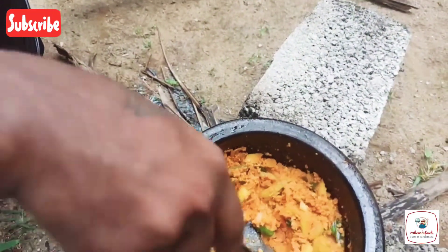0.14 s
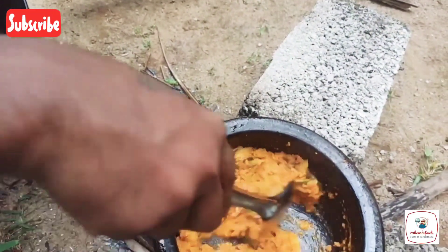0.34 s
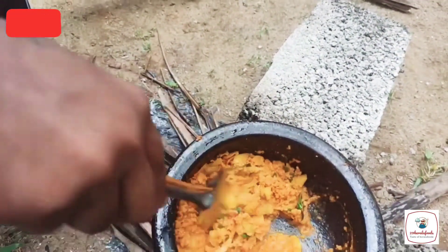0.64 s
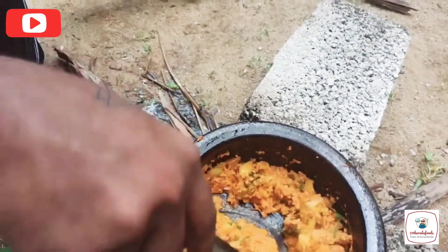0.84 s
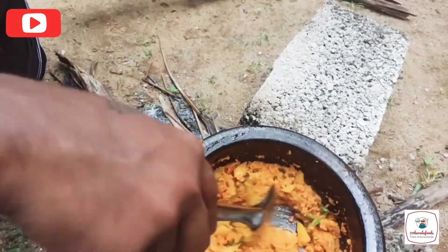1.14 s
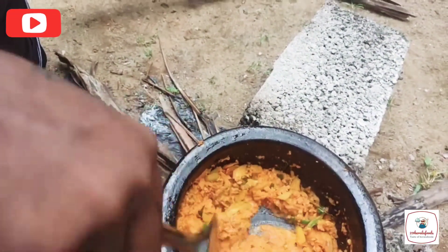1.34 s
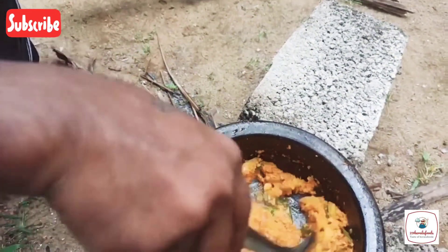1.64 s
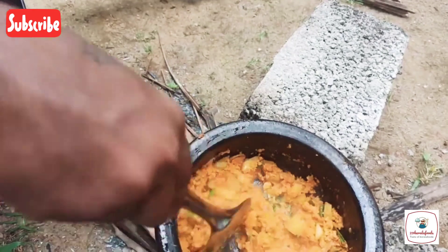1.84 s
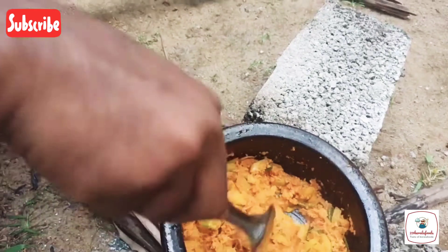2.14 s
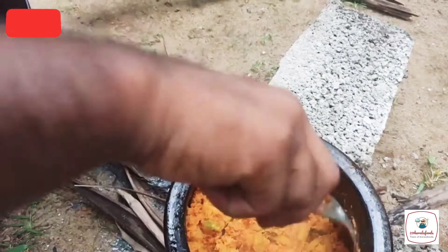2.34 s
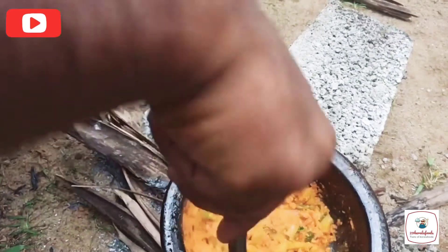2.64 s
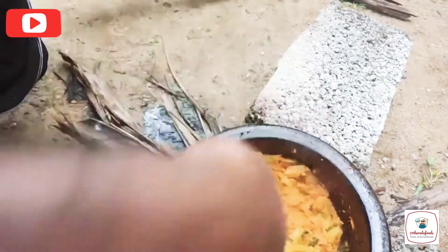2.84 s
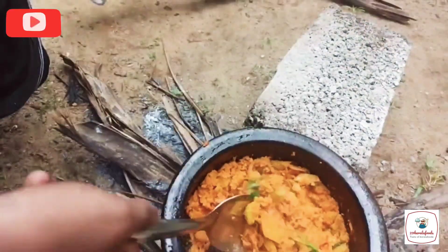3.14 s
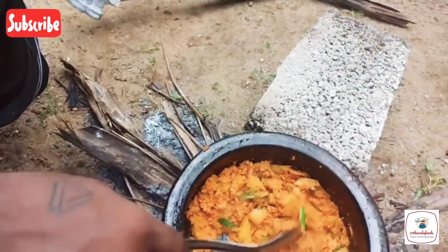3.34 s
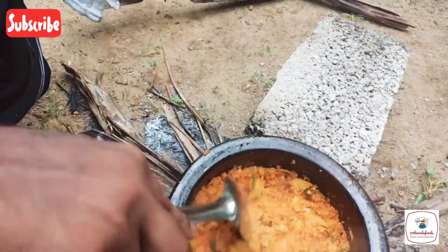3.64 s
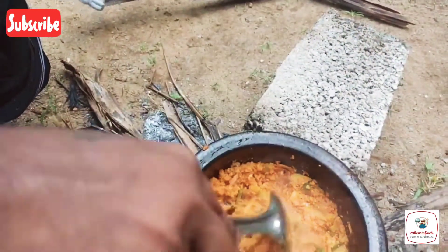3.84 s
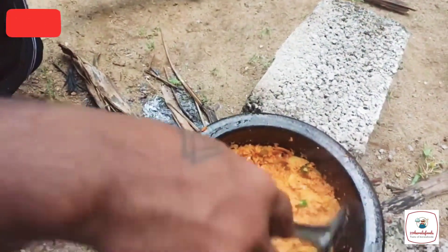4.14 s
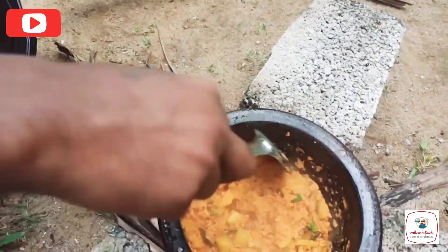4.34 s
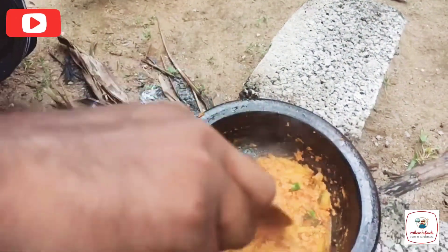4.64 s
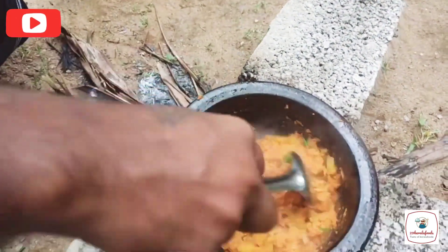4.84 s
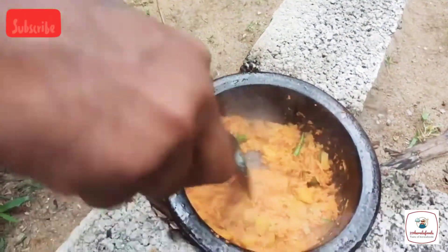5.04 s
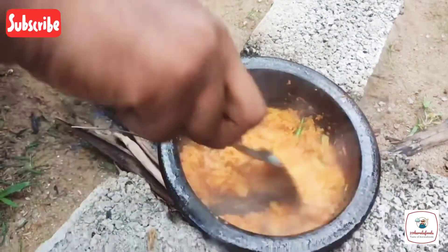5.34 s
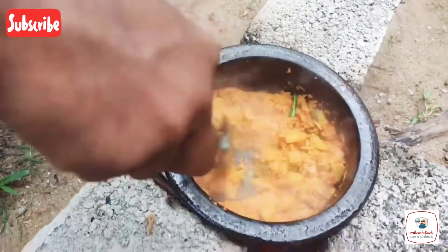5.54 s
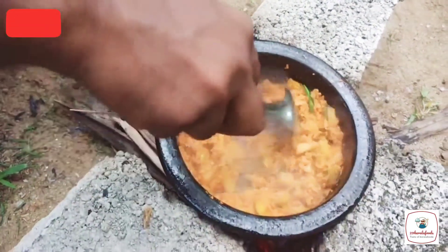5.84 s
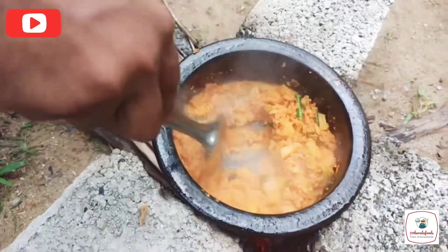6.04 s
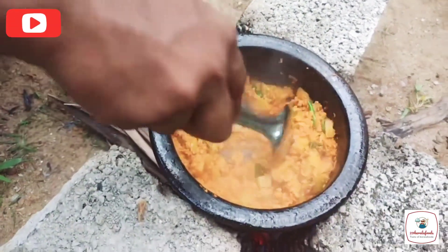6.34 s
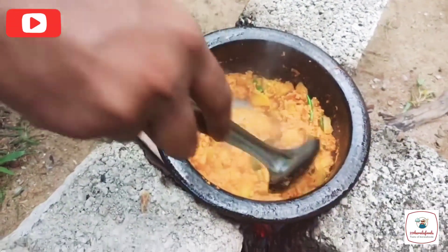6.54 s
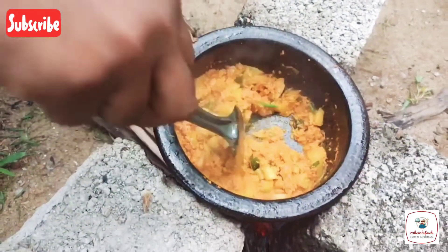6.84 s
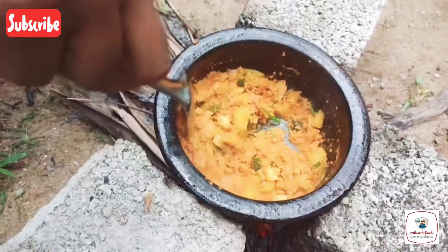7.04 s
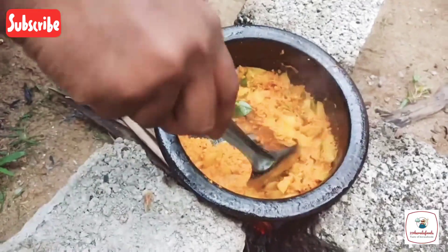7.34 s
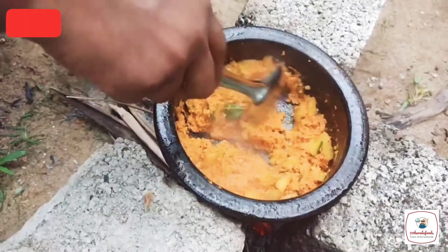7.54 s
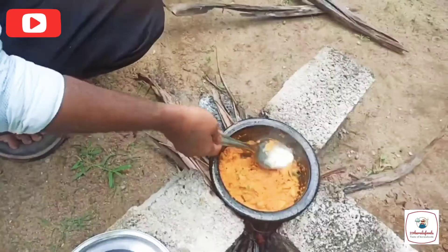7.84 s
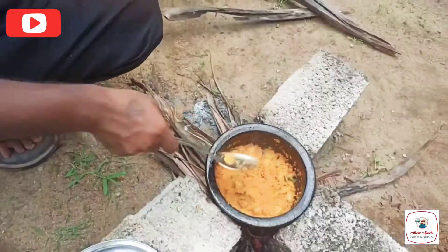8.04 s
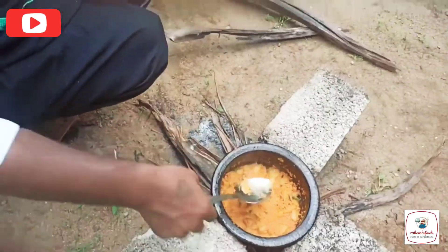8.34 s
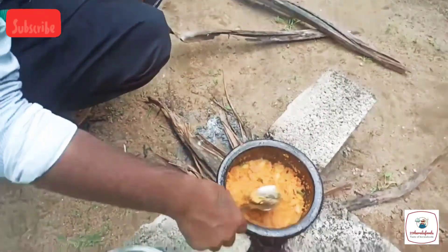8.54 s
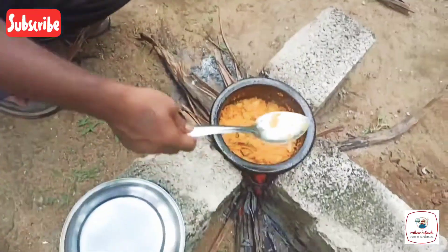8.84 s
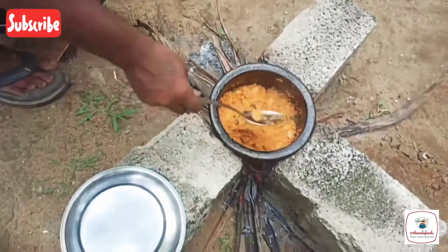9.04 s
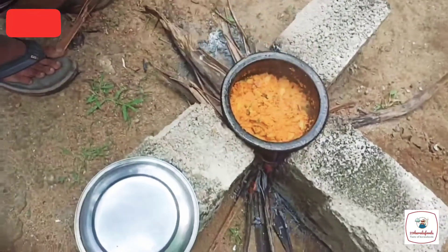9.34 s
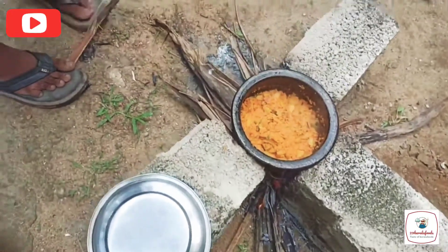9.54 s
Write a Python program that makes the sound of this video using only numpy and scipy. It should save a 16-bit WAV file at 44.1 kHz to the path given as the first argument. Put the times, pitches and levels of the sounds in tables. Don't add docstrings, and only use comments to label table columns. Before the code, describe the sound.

Close-up irregular stirring: gritty metal scrapes, dull thuds and brief bright clinks in a simmering pot, suddenly dropping to near silence.

```python
import sys
import numpy as np
from scipy import signal
from scipy.fft import rfft, irfft
from scipy.io import wavfile
from scipy.ndimage import uniform_filter1d

SR = 44100
rng = np.random.default_rng(int(sys.argv[2]) if len(sys.argv) > 2 else 0)


def makeup_ratio(level_db):
    decades = np.asarray(level_db, float) / 20
    return 10 ** decades


def bounce(signal):
    frames = np.transpose(np.atleast_2d(signal))
    limited = np.clip(frames, -1, 1)
    pcm = np.round(limited * 32767).astype(np.int16)
    wavfile.write(sys.argv[1], SR, pcm)


N = 427329

# f/Hz, level/dB per Hz
HISS_SPECTRUM = [(35, -58), (60, -28), (153, 1.5), (1420, -16.5), (4180, -19), (8260, -30), (8860, -26.5),
                 (9500, -33.5), (11200, -29.5), (16300, -35.5)]
# t/s, level/dB
FADE = [
    (7.735, 2.5),
    (7.752, -5.5),
    (7.765, -56),
]
# f/Hz, level/dB per Hz
SIZZLE_SPECTRUM = [(71, -28), (120, -0.5), (213, -1.5), (354, -6), (818, -4.5), (1340, -13), (2270, -15),
                   (4020, -12), (5350, -19.5), (6570, -11), (8220, -13.5), (10900, -37.5), (11900, -23),
                   (15800, -16.5)]
# f/Hz, left-right correlation
SIZZLE_LIKENESS = [(60, 0.67), (180, 0.6), (550, 0.71), (1650, 0.17), (4970, -0.01), (15000, 0.05)]
# f/Hz, level/dB per Hz
BODY = [(88, -54), (150, -18), (297, -8), (564, -1.5), (1120, -11), (1280, -17.5), (1820, -16),
        (3390, -22.5), (4200, -21), (5520, -30), (6700, -21), (8310, -22.5), (11100, -45.5), (12000, -25),
        (15800, -18)]
# f/Hz, level/dB over the body, t60/s
STEEL = [(1590, 5, .04), (1820, 6, .05), (2820, 5, .06), (3180, 4, .04), (3840, 4, .04), (4240, 8, .05),
         (4530, 2, .04), (6400, 5, .03), (6840, 5, .035), (7270, 1, .04), (7500, 5, .045), (8280, 3, .045),
         (8990, 5, .04)]
# f/Hz, t60/s
DAMPING = [(250, 0.078), (700, 0.03), (2000, 0.021), (6000, 0.055), (15000, 0.026)]
# f/Hz, phase/rad
PORT_SCATTER = [(300, .1), (700, 0.25), (1400, 1.7), (3000, 1.6), (7000, 6.5)]
# f/Hz, left over right level/dB
PORT_LEAN = [(60, -0.5), (180, 2), (550, 0.5), (1650, -1.5), (4970, 2.5), (15000, 11.5)]
PART_BORDERS = [1150, 3000, 11300]
DIFFUSE = [.1, .3, .6, .7]
# t/s, level/dB, spoon ring over thud level/dB, thud f/Hz
THUDS = [(.078, -20, -30, 532), (.28, -7.5, -35, 582), (.394, -12.5, -28, 564), (.824, -7, -28, 532),
         (.933, -22, -28, 458), (1.065, -11, -20, 584), (1.126, -15, -24.5, 643),
         (1.781, -18.5, -25.5, 526), (2.169, -19.5, -27.5, 530), (2.48, -9, -35.5, 556),
         (3.56, -35, -12.5, 620), (3.82, -30.5, -23, 410), (4.224, -18, -23, 577),
         (4.311, -26.5, -14.5, 765), (4.634, -25, -25, 500), (4.86, -10, -25, 604),
         (5.355, -14.5, -21, 485), (5.558, -19, -28.5, 575), (5.572, -9.5, -31.5, 504),
         (7.282, -13, -33.5, 490), (7.394, -19, -32.5, 540), (7.426, -29, -21.5, 640),
         (7.537, -11.5, -29, 625)]
# t/s, level/dB, wall ring over thud level/dB, thud f/Hz, ring f/Hz
RAPS = [(.711, -7.5, -17, 509, 1920), (1.05, -11.5, -9.5, 650, 1923), (1.354, -3.5, -8.5, 617, 1527),
        (1.434, -12.5, -8, 466, 2410), (1.519, -14.5, -17.5, 488, 2200), (1.669, -22.5, -16, 650, 1600),
        (2.456, -18, -11.5, 780, 1580), (2.918, -28, -5.5, 718, 2640), (3.76, -14, -12, 520, 1186),
        (4.122, -25.5, -21, 577, 1260), (4.844, -21, -14.5, 783, 3060), (5.289, -14, -5, 597, 1916),
        (5.645, -15.5, -19.5, 536, 1780), (5.789, -16, -18, 478, 1860), (5.87, -18, -15, 463, 2210),
        (6.201, -22.5, -3, 473, 1710), (6.765, -16, -21.5, 657, 1410), (6.84, -15, -11, 552, 1380),
        (7.156, -12.5, -6, 590, 1510), (7.239, -18.5, -19.5, 394, 2150)]
# t/s, level/dB, spoon ring over thud level/dB, thud f/Hz, ring f/Hz
CLINKS = [(.728, -20, 1, 521.4, 6420), (.756, -14.5, -2.5, 535, 8000), (2.431, -33, -4, 991, 7290),
          (2.439, -24, 7, 547, 6480), (2.548, -17.5, -1.5, 560, 3930), (2.569, -17, -11.5, 617, 6880),
          (2.609, -22, -7.5, 612, 4170), (2.626, -18.5, -4.5, 592, 4270), (2.652, -17.5, 3.5, 621, 4240),
          (4.162, -21.5, 1, 740, 7000), (4.403, -21, -14, 789, 6470), (4.454, -14, -2.5, 660, 6300),
          (6.093, -30, -10, 510, 3300), (6.734, -12.5, -9.5, 630, 6620), (7.097, -13, 3.5, 601, 8270)]
# start
# t/s, # length t/s, level/dB, from f/Hz, to f/Hz
SQUEAKS = [(.0, 0.78, -57, 4024, 4007), (1.17, .125, -36, 2450, 2300), (1.52, .16, -36, 950, 1300),
           (2.0, .11, -38, 1200, 1500), (2.55, .12, -33, 4150, 4300), (4.455, .09, -31, 4500, 4300),
           (5.6, .11, -35.5, 1960, 1780), (5.8, .11, -35, 2350, 2000), (6.049, 0.1483, -33, 2087, 1728),
           (6.197, .1, -43, 1780, 1900), (6.3, .1, -34, 1000, 1200)]
# peak t/s, rise t/s, fall t/s, drag level/dB, spoon over drag level/dB
PRESSED = [(.0, .01, 0.023, -34, -9), (.34, 0.086, 0.11, -28.5, -4), (.745, 0.064, 0.12, -24, -5),
           (1.19, 0.19, 0.1, -26.5, -9.5), (1.37, 0.058, 0.12, -28.5, -6.5), (1.58, 0.17, 0.12, -28, -3.5),
           (2.478, 0.058, 0.026, -31, -6.5), (2.57, 0.051, 0.1, -26.5, 4), (2.72, 0.17, 0.089, -43.5, -1.5),
           (2.95, 0.19, .16, -38.5, -3.5), (4.135, 0.027, 0.028, -35, -4.5), (4.19, 0.025, 0.1, -37.5, 6),
           (4.36, 0.17, 0.18, -39, -0.5), (4.86, 0.026, 0.027, -27, -10), (5.385, 0.058, .14, -24, -10.5),
           (5.61, 0.069, 0.13, -29, -9), (5.83, 0.083, 0.15, -23.5, -7), (6.02, 0.045, .07, -34.5, -11.5),
           (6.17, 0.13, 0.29, -33, -12), (6.79, 0.074, 0.14, -26.5, -5), (7.185, .045, 0.13, -25.5, -6.5),
           (7.66, 0.14, 0.11, -28.5, -5)]
SWEPT = [
    (2.045, .15, 0.16, -26.5, -2),
    (3.766, 0.067, 0.16, -38, -6),
    (4.485, 0.062, 0.17, -18.5, -1),
    (4.99, 0.19, 0.085, -19.5, -14.5),
    (5.293, 0.071, 0.089, -32.5, -1),
    (6.335, 0.14, 0.083, -21, -1.5),
    (7.1, 0.0077, 0.076, -23.5, 5),
    (7.553, 0.13, .15, -24.5, -7),
]
# drag level/dB, then wall, spoon and grit over drag level/dB
REST = (-56, -2, -2, -11)
LOST_HZ = [11050, 11520, 15800]
# f/Hz, level/dB
TREBLE_SHELF = [(7900, 0), (8520, -4), (8600, -18), (8800, -16), (8880, -6), (10300, 2), (11000, -3),
                (11500, 10), (12100, 0), (15000, 0), (15750, 3)]

HISS_DB, SIZZLE_DB, RUMBLE_DB = -63, -47, -61
SIMMER_STIRRED_DB, RUMBLE_STIRRED_DB, STIR_S = 1, 5, .6
THUD_WALL_DB, THUD_RING_HZ, RAP_SPOON_DB = -7.5, 1550, -5.5
CLINK_WALL_DB, CLINK_WALL_PER_RING = -15.5, .5
CRACK_DB, CRACK_S = 4, 0.0054
THUMP_DB, THUMP_S = 4, 0.0026
FIRM_BEND, GRAZE_BEND, LIFT_DB = 3.5, 1, -31
WALL_DB, WALL_PER_EDGE, GRIT_DB, GRIT_PER_EDGE = -6.5, 0.44, -7, .4
WALL_BITE = .4


def evened(x):
    return x / np.sqrt(np.mean(x ** 2) + 1e-20)


def read(points, hz):
    f, value = np.transpose(points)
    return np.interp(np.log(hz + 1), np.log(f + 1), value)


def slow(per_s, count=1):
    knots = rng.standard_normal((int(N / SR * per_s) + 2, count))
    at = np.arange(N) / SR * per_s
    return np.array([np.interp(at, np.arange(len(k)), k) for k in knots.T])


def noise(points, same, patchy_db):
    frames, hz = N // 512 + 5, np.fft.rfftfreq(2048, 1 / SR)
    a, b, c, d, patches = rng.standard_normal((frames, 1025, 5)).T
    patches = uniform_filter1d(patches, size=20, axis=0)
    patches = evened(uniform_filter1d(patches, size=6, axis=1))
    same = np.clip(read(same, hz), -1, 1)[:, None]
    left = a + 1j * b
    right = same * left + np.sqrt(1 - same ** 2) * (c + 1j * d)
    z = np.array([left, right]) * makeup_ratio(read(points, hz)[:, None] + patchy_db * patches)
    return evened(signal.istft(z, nperseg=2048, noverlap=1536)[1][:, :N])


def mono_hiss():
    rise = np.interp(np.arange(N) / SR, [FADE[0][0], FADE[-1][0]], [0, 1])
    return makeup_ratio(HISS_DB) * noise(HISS_SPECTRUM, [(20, 1), (20000, 1)], patchy_db=0.0) * rise


def sizzle(drag):
    busy = uniform_filter1d(np.log(drag), round(STIR_S * SR))
    busy = (busy - busy.min()) / np.ptp(busy)
    rumble_spectrum = [(20, -16.0), (50, -15.0), (100, 0.0), (140, -7.5), (250, -40.0)]
    rumble = noise(rumble_spectrum, [(20, 0.24), (200, 0.97)], patchy_db=1.0)
    simmer = noise(SIZZLE_SPECTRUM, SIZZLE_LIKENESS, patchy_db=1.2)
    simmer = makeup_ratio(SIZZLE_DB - 0.2 + SIMMER_STIRRED_DB * busy) * simmer
    return simmer + makeup_ratio(RUMBLE_DB + RUMBLE_STIRRED_DB * busy) * rumble


def rings(count, scatter_db, colour_db=None, blunt=0):
    dense = np.geomspace(235, 15800, num=360) * rng.uniform(0.93, 1.005, size=360)
    steel_hz, steel_db, steel_t60 = np.transpose(STEEL)
    hz = np.r_[dense, steel_hz]
    t60 = np.clip(np.r_[read(DAMPING, dense), steel_t60], .004, .4)
    db = read(BODY, hz) + np.r_[0 * dense, steel_db]
    size, phase, lag, tilt = rng.standard_normal((count, len(hz), 4)).transpose(2, 0, 1)
    if colour_db:
        db = db + colour_db(hz)
    sign = np.sign(phase + blunt * (hz < PART_BORDERS[0]))
    weight = makeup_ratio(db + scatter_db * size) * np.sqrt(hz / t60) * sign
    apart = read(PORT_SCATTER, hz)
    side = makeup_ratio(read(PORT_LEAN, hz) / 2 + 0.5 * apart * tilt) * np.exp(.5j * apart * lag)
    ports = weight[:, None] * np.stack([side, 1 / side], axis=1)
    t = np.arange(4096) / SR
    modes = np.exp((2j * np.pi * hz[:, None] - np.log(1000) / t60[:, None]) * t)
    part = np.searchsorted(PART_BORDERS, hz)
    ring = np.stack([(ports[..., part == k] @ modes[part == k]).imag for k in range(4)], axis=1)
    return ring / np.sqrt((ring ** 2).sum(axis=3).mean(axis=2))[..., None, None]


def blows():
    rows = []
    for s, db, ring_db, hz in THUDS:
        rows.append((s, db, ring_db + THUD_WALL_DB, ring_db, hz, THUD_RING_HZ))
    for s, db, ring_db, hz, top_hz in RAPS:
        rows.append((s, db, ring_db, ring_db + RAP_SPOON_DB, hz, top_hz))
    for s, db, ring_db, hz, top_hz in CLINKS:
        rows.append((s, db, CLINK_WALL_DB + CLINK_WALL_PER_RING * ring_db, ring_db, hz, top_hz))
    return sorted(rows)


def cracks(thud_db, wall_db, thud_hz):
    u = np.arange(900) / SR
    crack = (3. * (u == 0) + rng.standard_normal((len(thud_db), 2, 900))) * np.exp(-u / CRACK_S)
    crack = signal.sosfilt(signal.butter(2, (650, 5200), "band", fs=SR, output="sos"), crack)
    crack *= makeup_ratio(CRACK_DB + thud_db + wall_db)[..., None] / np.abs(crack).max(axis=2, keepdims=True)
    thump = np.sin(2 * np.pi * thud_hz * u) * (1 - np.exp(-u / .0006)) * np.exp(-u / THUMP_S)
    return crack - (makeup_ratio(THUMP_DB + thud_db) * thump)[:, None]


def knocks():
    s, thud_db, wall_db, spoon_db, thud_hz, ring_hz = np.transpose(blows())[:, :, None]

    def bump(hz, centre_hz, octaves):
        return np.exp(-(np.log2(hz / centre_hz) / octaves) ** 2)

    def colour_db(hz):
        return 30.0 * bump(hz, thud_hz, .24) + 17.0 * bump(hz, ring_hz, 0.07)

    ring = rings(len(s), 1.6, colour_db, blunt=.5)
    t = np.arange(220) / SR
    contact = rng.standard_normal((len(s), 220)) * (t / .0008) * np.exp(-t / 0.0014)
    push = np.exp(-(t / 0.00015 - 3) ** 2)
    crack = cracks(thud_db, wall_db, thud_hz)
    out = np.zeros((2, N + 5000))
    for k, at in enumerate(np.round((s[:, 0] + 0.00079) * SR).astype(int)):
        wall, spoon = wall_db[k, 0], spoon_db[k, 0]
        gains = makeup_ratio(thud_db[k, 0] + np.array([5., 22.5 + wall, 22.5 + spoon, 9.5 + spoon]))
        blow = np.array([push / push.sum()] + 3 * [contact[k] / np.linalg.norm(contact[k])])
        parts = signal.oaconvolve(ring[k], blow[:, None], axes=2)[..., :4096]
        out[:, at:at + 4096] += np.tensordot(gains, parts, axes=1)
        out[:, at + 30:at + 930] += crack[k]
    return out[:, :N]


def strokes():
    t = np.arange(N // 32 + 2) * 32 / SR
    power = makeup_ratio(REST[0] + np.array([0, *REST[1:]]))[:, None] ** 2 * np.ones(len(t))
    for rows, bend in ((PRESSED, FIRM_BEND), (SWEPT, GRAZE_BEND)):
        for peak_s, rise_s, fall_s, drag_db, edge_db in rows:
            away = abs(t - peak_s) / np.where(t < peak_s, rise_s, fall_s)
            lift_db = LIFT_DB * np.minimum(away, 3) ** bend
            wall_db = WALL_DB + WALL_PER_EDGE * edge_db
            grit_db = GRIT_DB + (1 + GRIT_PER_EDGE) * edge_db
            parts_db = np.array([0, wall_db, edge_db, grit_db])[:, None]
            power = power + makeup_ratio(drag_db + parts_db + lift_db) ** 2
    return np.array([np.interp(np.arange(N) / SR, t, np.sqrt(p)) for p in power])


def squeak(slips):
    out, r = np.zeros(N), np.exp(-np.pi * 190. / SR)
    for s, length, db, from_hz, to_hz in SQUEAKS:
        u = np.linspace(0, 1, round(length * SR))
        start = round(s * SR)
        at = slice(start, start + len(u))
        turn = np.exp(2j * np.pi * np.cumsum(from_hz + (to_hz - from_hz) * u) / SR)
        tone = (turn * signal.lfilter([1 - r], [1, -r], slips[at] / turn)).real
        out[at] += makeup_ratio(db) * np.sin(np.pi * u ** 1.2) ** 1.5 * evened(tone)
    return out


def scrape(pushes):
    grit = makeup_ratio(2.0 * slow(100.)[0] + 4.2 * np.minimum(rng.exponential(size=N), 4))
    grit *= rng.random(N) < 2200. / SR
    grit /= np.sqrt(uniform_filter1d(grit ** 2, size=1500) + 1e-9)
    slips, other = grit * rng.choice([-1, 1], (2, N))
    spot = makeup_ratio(22.0 * slow(22., count=6))
    spot /= np.sqrt((spot ** 2).sum(axis=0))
    drive = []
    for gain, d in zip(pushes, DIFFUSE):
        drive.append(gain * np.array([slips, np.sqrt(1 - d ** 2) * slips + d * other]))
    bite_power = uniform_filter1d(grit ** (2 + 2 * WALL_BITE), size=1500)
    drive[1] = drive[1] * grit ** WALL_BITE / np.sqrt(bite_power + 1e-9)
    out, end = np.zeros((2, N)), round(FADE[-1][0] * SR)
    for share, ring in zip(spot, rings(count=6, scatter_db=3.0)):
        for push, part in zip(drive, ring):
            out[:, :end] += signal.oaconvolve((push * share)[:, :end], part, axes=1)[:, :end]
    squeal = squeak(slips)
    return makeup_ratio(-3.0) * out + np.array([squeal, 1.2 * np.roll(squeal, shift=5)])


def scene():
    pushes = strokes()
    spoon = scrape(pushes) + knocks()
    no_bass = signal.butter(6, 235., "high", fs=SR, output="sos")
    return signal.sosfilt(no_bass, spoon) + sizzle(pushes[0])


def starve(x, under_db):
    hz, _, z = signal.stft(x, SR, nperseg=2048, noverlap=1024)
    power = uniform_filter1d(abs(z) ** 2, size=2, axis=2).mean(axis=0)
    bright = power[(hz > 3000) & (hz < 8500)].mean(axis=0)
    band = np.repeat(power[:1024].reshape(128, 8, -1).mean(axis=1), 8, axis=0)
    whim = uniform_filter1d(rng.standard_normal((power.shape[1], 128)), size=3, axis=0)
    whim = np.repeat(whim.T, 8, axis=0)
    low_hz = hz[:1024, None]
    strong = band > bright * makeup_ratio(under_db + 5 * whim) ** 2
    z[:, :1024] *= strong | (low_hz < 2500) | (low_hz > LOST_HZ[1])
    return signal.istft(z, SR, nperseg=2048, noverlap=1024)[1][:, :N]


def top_cut(x):
    return signal.sosfilt(signal.butter(12, 16450, fs=SR, output="sos"), x)


def record(dry):
    hz = np.fft.rfftfreq(N, 1 / SR)
    kept = (hz < LOST_HZ[0]) | (hz > LOST_HZ[1]) & (hz < LOST_HZ[2])
    heard = irfft(rfft(np.clip(dry, -1, 1)) * makeup_ratio(read(TREBLE_SHELF, hz)), N)
    phone = irfft(rfft(starve(heard, under_db=-20.5)) * kept, N)
    s, db = np.transpose(FADE)
    faded = phone * makeup_ratio(np.interp(np.arange(N) / SR, s, db, right=-200))
    return top_cut(faded + mono_hiss())


dry = scene()
out = record(dry)
bounce(out)
```